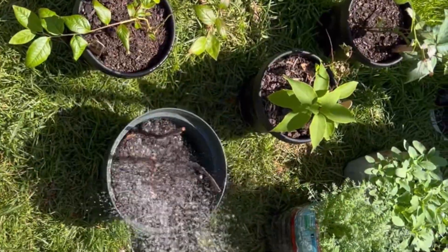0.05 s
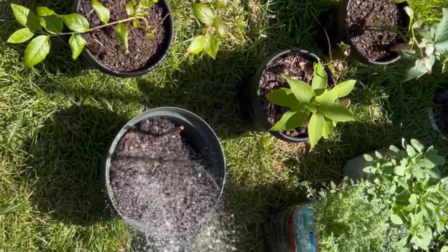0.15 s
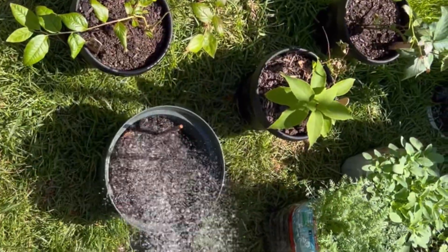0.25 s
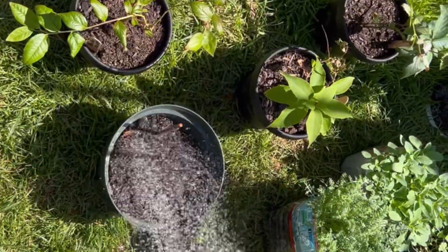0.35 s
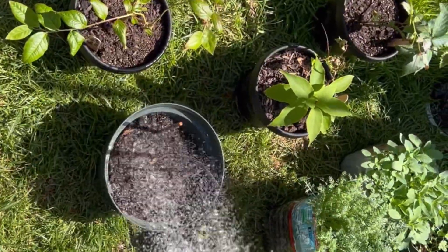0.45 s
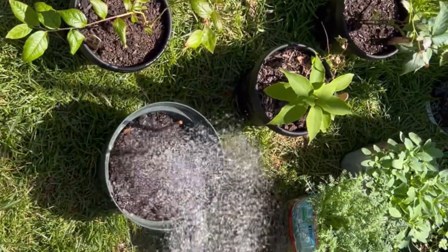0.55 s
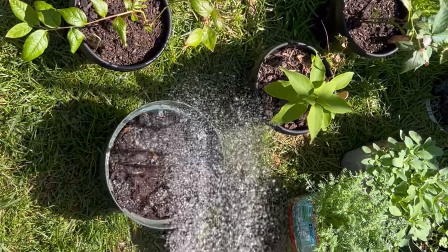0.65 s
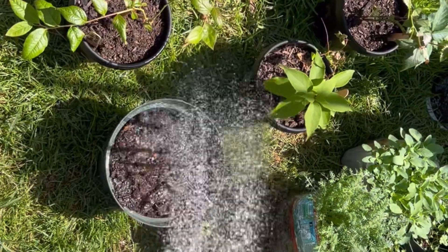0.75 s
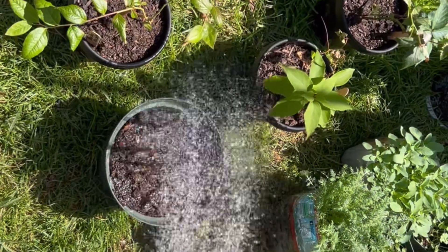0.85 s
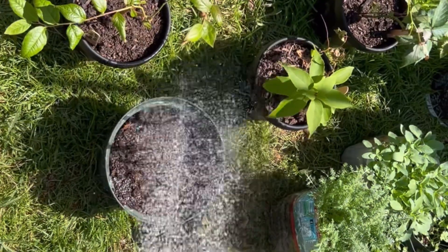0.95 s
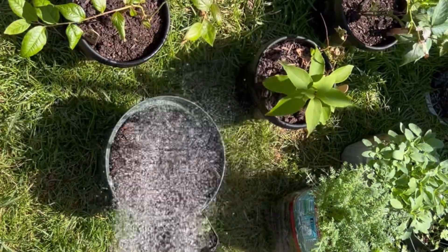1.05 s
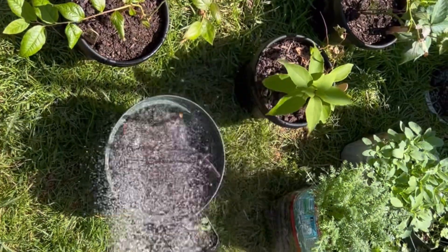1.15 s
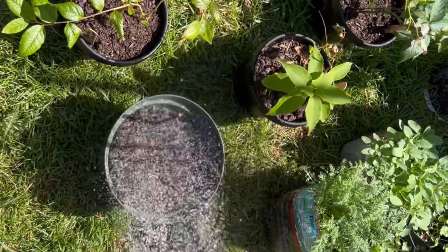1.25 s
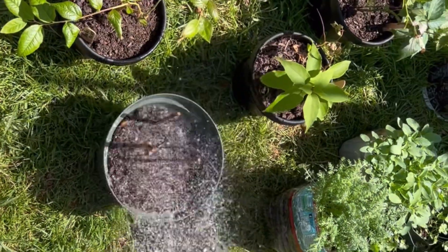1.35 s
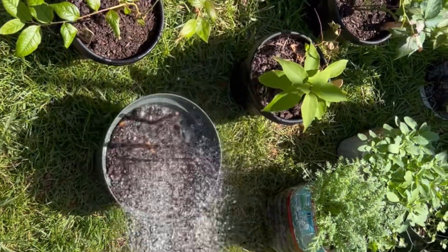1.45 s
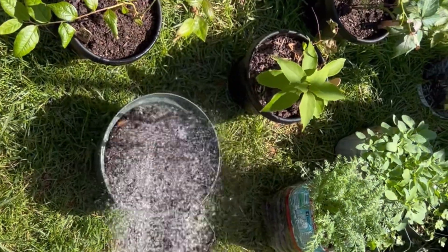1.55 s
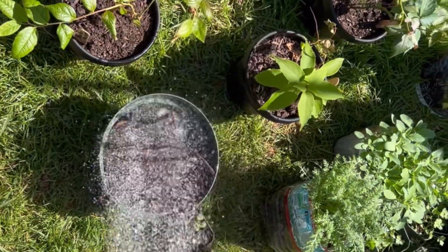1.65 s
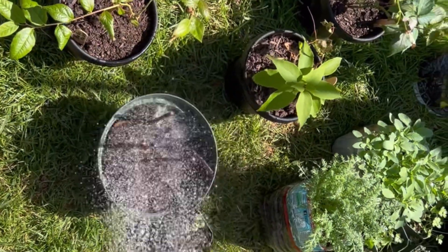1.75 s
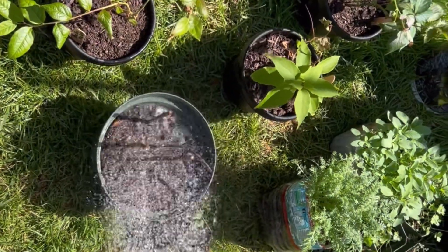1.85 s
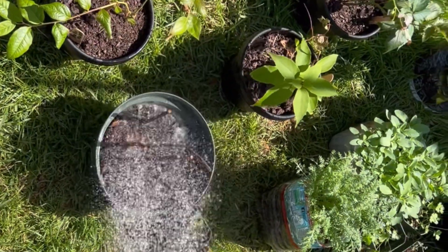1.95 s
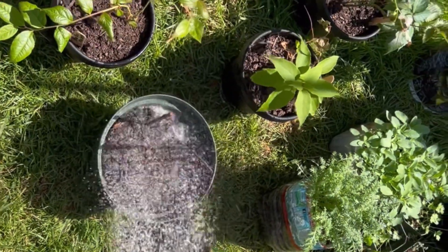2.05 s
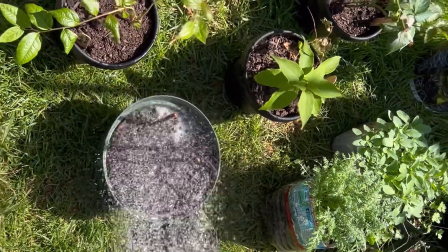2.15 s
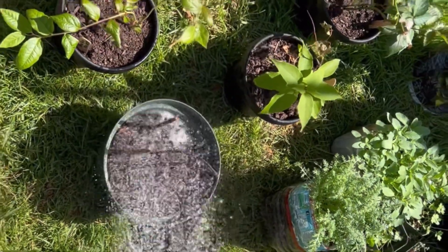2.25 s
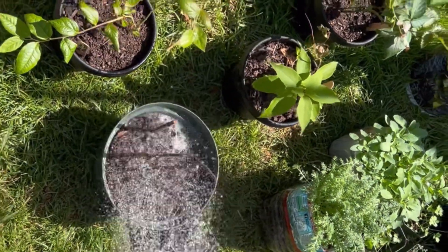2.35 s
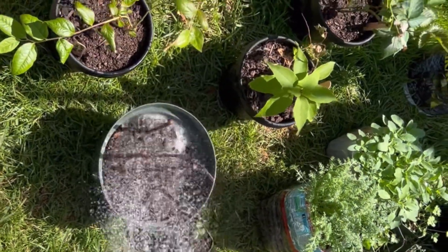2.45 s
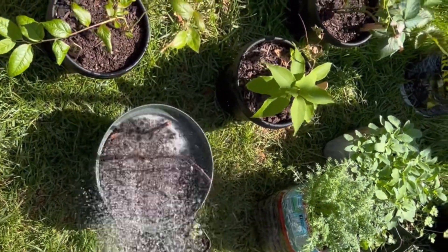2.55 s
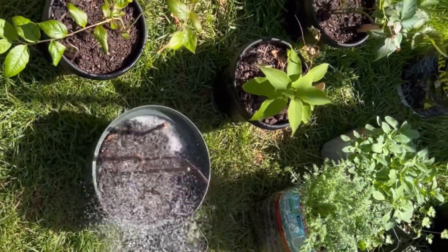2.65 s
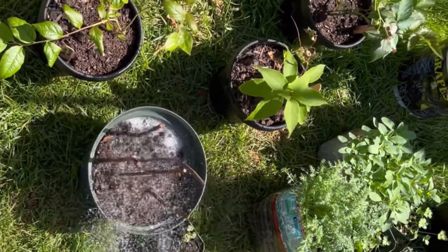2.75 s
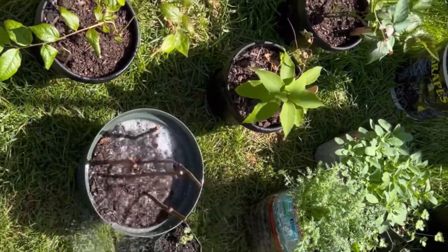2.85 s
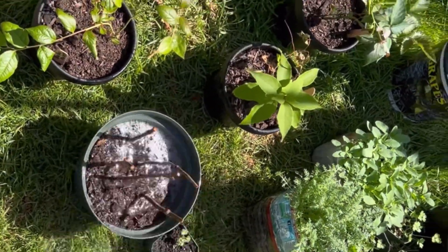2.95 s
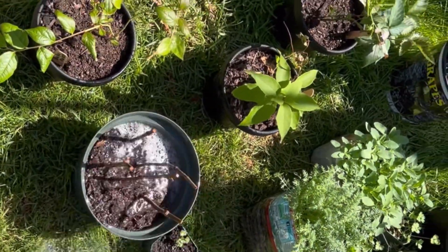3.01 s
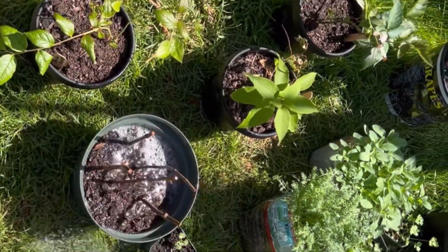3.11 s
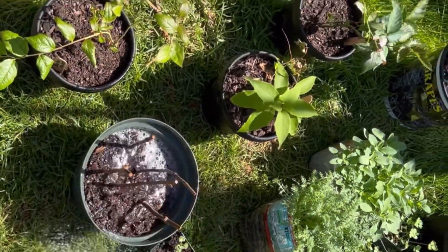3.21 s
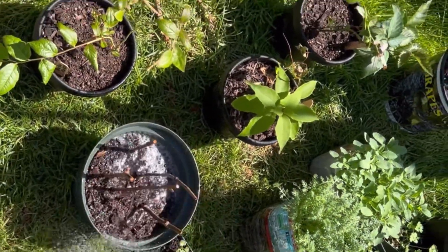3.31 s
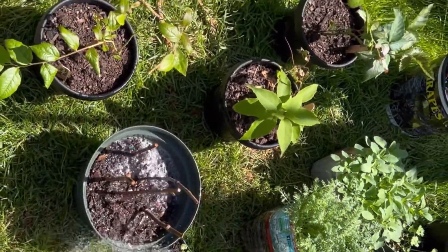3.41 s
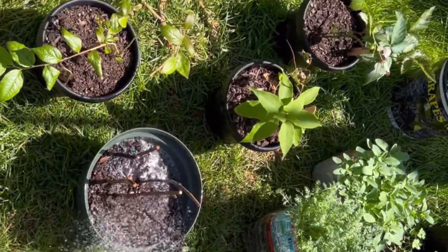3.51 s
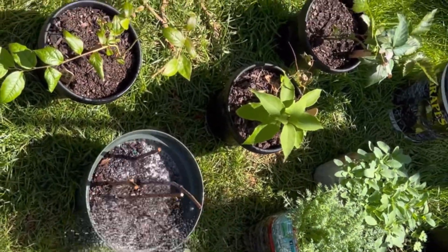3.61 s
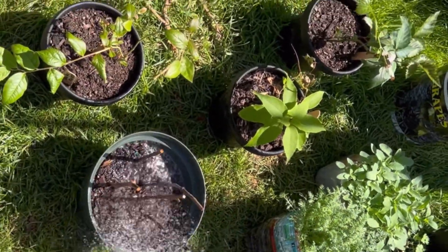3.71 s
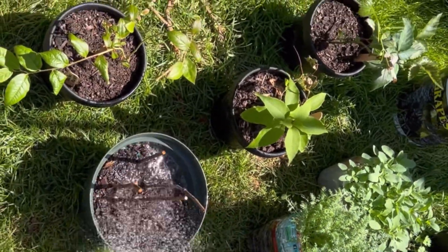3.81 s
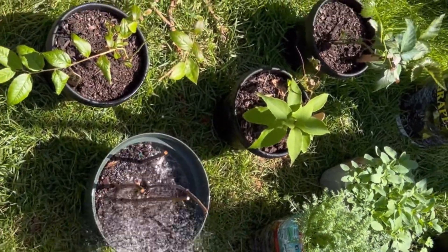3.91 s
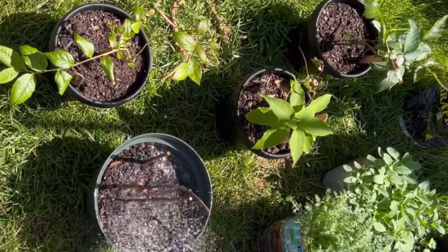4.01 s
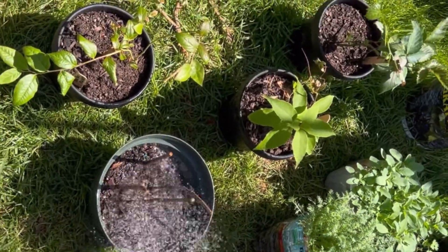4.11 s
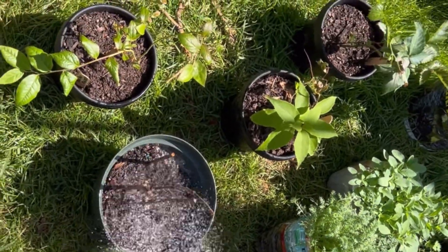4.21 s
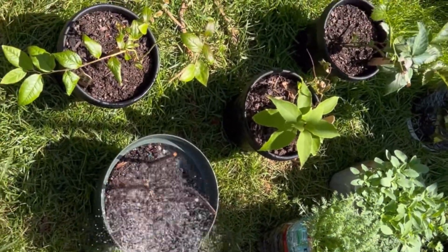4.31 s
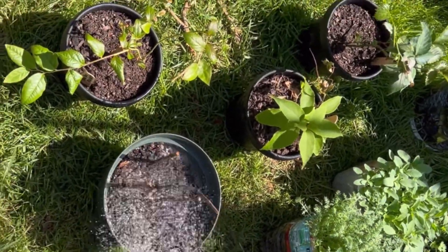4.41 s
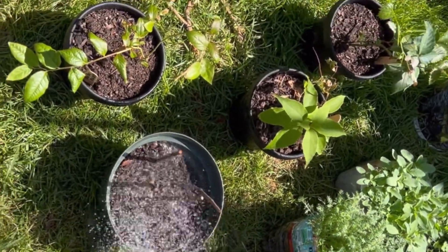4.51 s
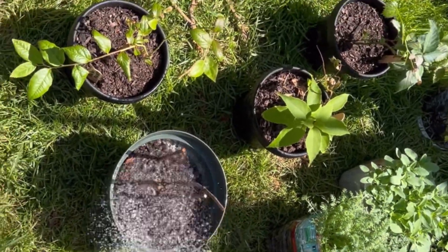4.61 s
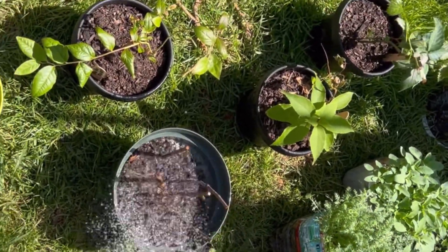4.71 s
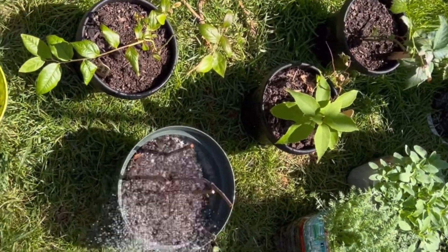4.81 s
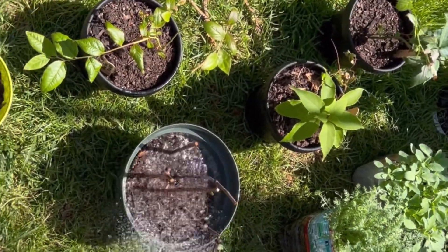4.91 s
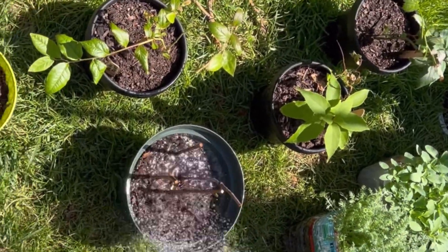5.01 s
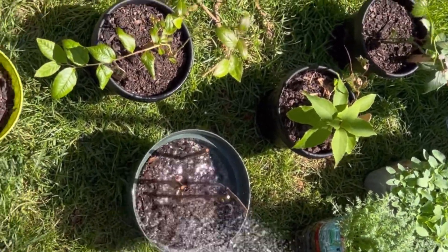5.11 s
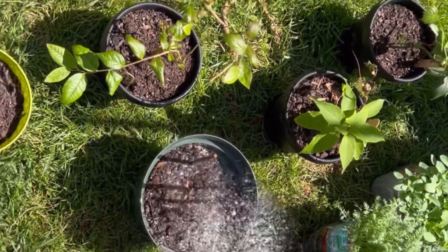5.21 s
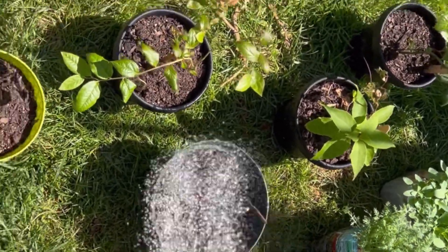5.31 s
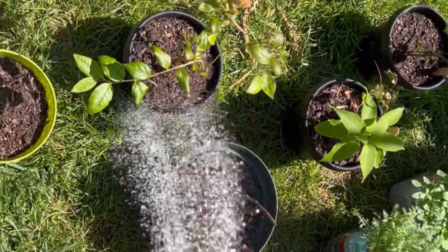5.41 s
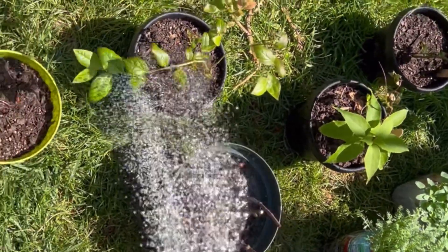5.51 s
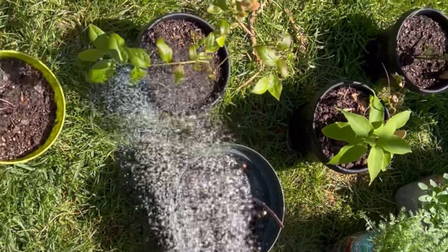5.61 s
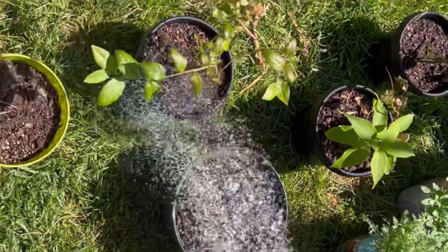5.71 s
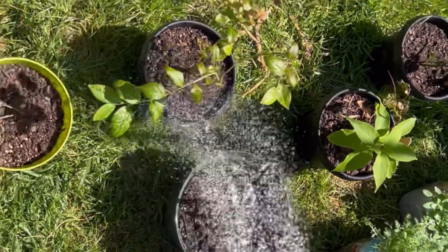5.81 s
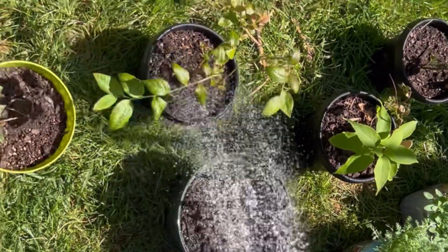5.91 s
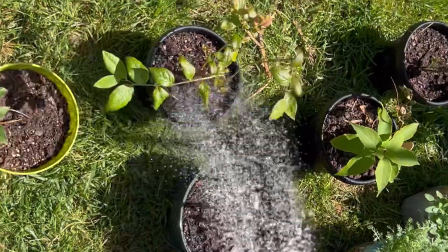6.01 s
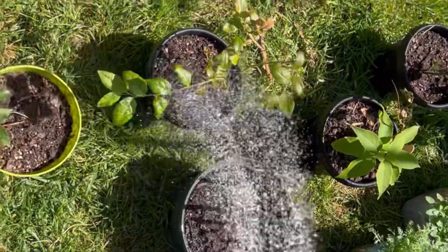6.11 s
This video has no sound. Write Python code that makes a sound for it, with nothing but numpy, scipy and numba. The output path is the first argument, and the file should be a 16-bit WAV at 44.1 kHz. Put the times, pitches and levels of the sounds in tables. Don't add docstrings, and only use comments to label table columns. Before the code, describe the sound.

A garden hose is heard outdoors at arm's length through a phone's stereo microphones. From 0 to 0.4 s a bright, strong jet hiss dominates, with coarse splashing on drier soil; it then drops back abruptly. Brief brushes and ticks come around 0.6 s, and the spray fills out from about 1.1 s into a dense, fine, sizzling shower with soil thuds. Watery bubble plops cluster at 2.05-2.3 s. Near 2.7-2.8 s the hiss surges and drops crack on the rim, then the patter falls away, leaving a thin nozzle hiss until about 3.4 s. Spray returns, fullest after 4.1 s, with crisp rim pings and ticks. A short splashy swell at 5.3 s leads to lighter, fizzing patter on leaves until just past 6 s. Traffic rumbles low throughout; from 2 s a faint distant engine hums, revs and wavers, with slight leaf rustle.

```python
import sys
import numpy as np
from scipy import signal
from scipy.fft import rfft, irfft
from scipy.io import wavfile
from scipy.ndimage import uniform_filter1d
from numba import njit

SR = 44100
rng = np.random.default_rng(int(sys.argv[2]) if len(sys.argv) > 2 else 0)


def bounce(signal):
    frames = np.transpose(np.atleast_2d(signal))
    limited = np.clip(frames, -1, 1)
    pcm = np.round(limited * 32767).astype(np.int16)
    wavfile.write(sys.argv[1], SR, pcm)


def to_linear_factor(level_db):
    exponent = np.asarray(level_db, float) / 20
    return 10 ** exponent


N = 271479
TIME = np.arange(N) / SR
HZ = np.fft.rfftfreq(N, 1 / SR)
ALIKE = np.array([[1], [0]])


def read(points):
    hz, value = np.transpose(points)
    return np.interp(np.log(HZ + 1), np.log(hz + 1), value)


def curves(table):
    s, *columns = np.transpose(table)
    return [np.interp(TIME, s, column) for column in columns]


def unit(x):
    return x / np.sqrt(np.mean(x ** 2))


def hiss():
    return rng.standard_normal((2, N))


def colour(x, points):
    low_hz, high_hz = points[0][0], points[-1][0]
    low_edge = 1 / (1 + (low_hz / (HZ + 1)) ** 4)
    high_edge = 1 / (1 + (HZ / high_hz) ** 4)
    return unit(irfft(rfft(x) * to_linear_factor(read(points)) * low_edge * high_edge, N))


def ring(x, modes):
    power = 0
    for hz, width, db in modes:
        off_pitch = (HZ ** 2 - hz ** 2) / (1.7 * width * (HZ + 1))
        power = power + to_linear_factor(2 * db) / (1 + off_pitch ** 2) ** 2
    return unit(irfft(rfft(x) * np.sqrt(power), N))


def walk(rate):
    hold = int(SR / rate)
    levels = np.repeat(rng.standard_normal(N // hold + 1), hold)
    return unit(uniform_filter1d(levels, hold)[:N])


@njit
def grains(start, hz, cycles, size, glide):
    out = np.zeros(N)
    for k in range(len(start)):
        step = 2 * np.pi * hz[k] / SR
        phase, gain, fade = 0., size[k], np.exp(-hz[k] / SR / cycles[k])
        for i in range(start[k], min(N, start[k] + int(6 * cycles[k] * SR / hz[k]))):
            out[i] += gain * min(phase / (2 * np.pi), 1.) * np.sin(phase)
            phase += step
            step *= 1 + glide * hz[k] / SR
            gain *= fade
    return out


def shower(count, low_hz, high_hz, cycles, spread_db, biggest_db):
    when, pitch, length, size = rng.random((count, 4)).T
    hz = np.minimum(low_hz + (high_hz - low_hz) * pitch, .45 * SR)
    size_db = biggest_db * np.tanh(-spread_db * np.log(1 - size) / biggest_db)
    strength = to_linear_factor(size_db) * np.sqrt(hz / high_hz)
    start = (when * N).astype(np.int64)
    return unit(grains(start, hz, cycles * (.5 + length), strength, .02))


def two_showers(**settings):
    return [shower(**settings) for _ in range(2)]


def drops(table, cycles, glide, gain_db):
    s, db, hz = np.transpose(table)
    return grains((s * SR).astype(np.int64), 1. * hz, cycles + 0 * s, to_linear_factor(db + gain_db), glide)


def fade(x, tail_s):
    return signal.lfilter([1], [1, -np.exp(-1 / (tail_s * SR))], x)


def clumps(count, tail_s, cap):
    when, size = rng.random((count, 2)).T
    x = fade(np.bincount((when * N).astype(np.int64), -np.log(1 - size), N), tail_s)
    return cap * np.tanh(unit(x - x.mean()) / cap)


# t/s, chamber ring level/dB, jet or rim drumming level/dB
GRIPS = [(0, -46.5, -34.5), (.39, -48.5, -41), (.43, -48.5, -55), (.63, -48, -45), (.7, -48, -60),
         (1.0, -47, -49.5), (1.2, -50, -51), (2.0, -49, -49), (2.69, -46, -40), (2.83, -51.5, -47.5),
         (3.27, -47, -44), (3.33, -46.5, -53.5), (3.75, -46.5, -47.5), (5.2, -45.5, -44.5),
         (5.4, -44.5, -57), (5.72, -46.5, -55.5)]


def grips():
    s, *columns = np.transpose(GRIPS)
    now = np.searchsorted(s, TIME, "right") - 1
    slide_s = .018
    return [uniform_filter1d(column[now], int(slide_s * SR)) for column in columns]


# f/Hz, width/Hz, level/dB
CHAMBER = [(1577, 175, -4.5), (1920, 75, 0), (2180, 82, 2.5), (2338, 157, -1.5)]
# f/Hz, width/Hz, level/dB
JET_WIDE = [(1560, 59, -8), (3470, 130, 1.5), (4470, 280, -5.5), (5700, 360, -8), (6810, 360, -8),
            (7840, 800, -2), (8340, 680, 2.5), (9700, 600, -3.5), (10600, 750, -5.5)]
# f/Hz, width/Hz, level/dB
JET_HALF = [(3280, 480, -2.5), (4610, 190, 1), (5500, 180, -3), (6360, 410, 2.5), (7000, 900, -12),
            (7870, 1400, 1.5), (10400, 1700, -11), (14200, 4000, -12)]
# f/Hz, level/dB
RIM = [(4500, -3), (6200, -3.5), (7200, -10), (8200, 0), (9200, -4), (11000, -21)]


def nozzle():
    chamber_db, jet_db = grips()
    chamber = ring(hiss(), CHAMBER) * to_linear_factor(chamber_db + 0.91 * walk(25) + 1.0)
    taps = two_showers(count=5000, low_hz=5330, high_hz=10150, cycles=2.8, spread_db=4.0, biggest_db=26)
    jet = colour(0.86 * hiss() + taps, RIM) * to_linear_factor(-2.0)
    jet = np.where(TIME < .43, ring(hiss(), JET_WIDE) * to_linear_factor(-3.0), jet)
    half_shut = (TIME > 2.83) & (TIME < 3.33)
    jet = np.where(half_shut, ring(hiss(), JET_HALF) * to_linear_factor(0.5), jet)
    return chamber + jet * to_linear_factor(jet_db + 1.3 * walk(30))


# t/s, spray landing on the pot level/dB, coarseness of the drops level/dB
SPRAY = [(0, -45, 2.5), (.4, -46, 2.5), (.44, -45.5, -5.5), (.59, -46, -2.5), (.66, -43, -2.5),
         (.89, -42.5, -1), (1.1, -38.5, -4), (1.5, -39, -2.5), (2.47, -38.5, -2), (2.81, -40.5, -5.5),
         (2.85, -52.5, -0.5), (3.0, -57, -1), (3.47, -51.5, -1), (3.53, -47, -4.5), (4.15, -42, -5.5),
         (5.25, -46.5, -2.5), (5.42, -52.5, 1.5), (6.16, -45, -2.5)]
# t/s, change level/dB, half length/s, share felt by coarse drops
SWAYS = [(0.628, 8, .02, 0.71), (1.294, 5, 0.0076, .3), (1.39, 1, 0.025, .3), (1.438, -3.5, 0.024, 1.2),
         (1.726, 0, 0.058, .3), (1.945, 2, 0.014, .2), (2.747, 2, 0.039, 2.9), (3.524, 3.5, .02, .6),
         (4.272, 1.5, 0.016, 1.6), (4.818, 2, 0.0088, 1.9), (5.04, -0.5, 0.045, .3),
         (5.322, 10, 0.054, 0.75), (5.593, 6.5, 0.019, .2), (5.628, -7, .008, .3), (5.65, 2.5, 0.024, .3),
         (5.8, -6, 0.044, .1), (6.134, 3, .01, .6)]


def landing():
    aim_db, coarse_db = curves(SPRAY)
    fine_db, splash_db = aim_db, aim_db + coarse_db
    for at, change_db, half_s, share in SWAYS:
        sway_db = change_db * np.clip(1 - abs(TIME - at) / half_s / 2, 0, 1)
        fine_db = fine_db + sway_db
        splash_db = splash_db + share * sway_db
    dry_db = -7 * np.clip((.43 - TIME) / 0.087, 0, 1)
    above_usual_db = splash_db + 45
    puddle_db = -53 + 0.87 * above_usual_db + dry_db
    soil_db = -54 + 0.38 * above_usual_db + 0.43 * dry_db
    return fine_db, splash_db, puddle_db, soil_db


# f/Hz, level/dB
FINE = [(5000, -18.5), (7500, -5.5), (9500, -2), (11000, 1), (12200, -4), (14000, -5.5), (15700, -7.5),
        (30000, 4)]
# f/Hz, level/dB
SPLASH = [(1500, -7), (2600, 2), (3500, 1.5), (4600, 0), (5200, -5.5), (7000, -6), (9000, -24)]
# f/Hz, level/dB
PUDDLE = [(500, -9), (800, 3), (1250, 0), (1600, 4.5), (2000, 5), (2600, -13), (3500, -23)]
# f/Hz, level/dB
SOIL = [(150, 1), (250, 1), (400, -0.5), (600, -2.5), (1000, -3)]


def spray():
    fine_db, splash_db, puddle_db, soil_db = landing()
    slugs = clumps(count=400, tail_s=0.03, cap=1.8)
    ticks = two_showers(count=16000, low_hz=4840, high_hz=16900, cycles=0.96, spread_db=5.0, biggest_db=10)
    pops = two_showers(count=9000, low_hz=1800, high_hz=7000, cycles=2.5, spread_db=2.6, biggest_db=14)
    bubbles = two_showers(count=4000, low_hz=586, high_hz=3180, cycles=2.3, spread_db=-2.5, biggest_db=12)
    fine = colour(1.02 * hiss() + ticks, FINE) * to_linear_factor(fine_db + 0.78 * slugs + 2.0)
    splash = colour(2.4 * hiss() + pops, SPLASH) * to_linear_factor(splash_db + 1.5 * slugs - 1.2)
    puddle = colour(2.4 * hiss() + bubbles, PUDDLE) * to_linear_factor(puddle_db + 0.12 * slugs + 3.5)
    soil = colour(hiss(), SOIL) * to_linear_factor(soil_db + 1.3 * walk(12))
    return fine + splash + puddle + soil


# f/Hz, level/dB (per Hz)
TOWN = [(22, -26), (48, 0), (69, 3), (127, -3.5), (166, -7.5), (300, -16.5), (600, -22), (1300, -26),
        (5000, -36), (15500, -50), (30000, -36)]


def traffic():
    return colour(hiss(), TOWN) * to_linear_factor(-49.5 + 1.3 * walk(6))


# f/Hz, level/dB
RUSTLE = [(2400, 0), (3000, 0), (3500, -3)]


def rustle():
    calm_db = -8 * np.clip((2.3 - TIME) / .2, 0, 1)
    leaves = colour(rng.standard_normal(N), RUSTLE) * to_linear_factor(-61 + calm_db + 2.0 * walk(6))
    return leaves * np.array([[1], [-1]])


# t/s, peak level/dB, f/Hz
PLOPS = [(0.1285, -23, 3260), (1.3702, -28, 2330), (1.6386, -23.5, 1610), (1.8715, -23, 2120),
         (2.0534, -34.5, 1950), (2.065, -22.5, 1810), (2.0774, -17, 4380), (2.0974, -27, 1920),
         (2.1044, -23, 4020), (2.1094, -23, 2520), (2.1204, -24, 2030), (2.1429, -23.5, 2040),
         (2.1684, -23, 1600), (2.1759, -22, 1270), (2.2564, -28, 2030), (2.2784, -26, 2100),
         (2.5625, -27, 1970), (2.6059, -35.5, 1910), (2.6982, -28, 2210), (2.7366, -19.5, 2180),
         (2.7939, -29, 1740), (3.92, -29, 3200), (3.9902, -24.5, 2120), (4.089, -31, 3300),
         (4.167, -24, 3900), (4.815, -27, 4200), (4.9111, -28, 2130), (5.2848, -27, 2230)]


def plops():
    return drops(PLOPS, cycles=1.9, glide=0.014, gain_db=1.9) * ALIKE


# f/Hz, level/dB
SPLATTER = [(3500, -2), (6000, -5), (9000, 4), (11500, 2), (15700, -9), (30000, 0)]


def fizz(table, tail_s, gain_db):
    s, db, hz = np.transpose(table)
    hits = np.bincount((s * SR).astype(np.int64), to_linear_factor(db + gain_db), N)
    return fade(hits, tail_s) * colour(hiss(), SPLATTER)


# t/s, peak level/dB, f/Hz
TICKS = [(0.615, -19.5, 8900), (0.6744, -25, 8250), (0.9167, -22, 10800), (0.9458, -23, 11500),
         (1.1887, -25, 11100), (1.2143, -19.5, 9620), (1.2858, -18, 11100), (1.5484, -28, 10800),
         (1.5574, -22, 8310), (1.6273, -25, 10900), (1.9535, -15, 9860), (2.4517, -17, 10800),
         (2.6085, -27, 11200), (2.7202, -20, 11600), (3.589, -25.5, 10400), (4.1694, -46, 10900),
         (4.2368, -25.5, 9260), (4.261, -16.5, 11800), (4.3071, -27, 10700), (4.4363, -27, 10900),
         (4.5062, -20.5, 10000), (4.6064, -23, 11400), (4.6513, -22, 11100), (4.684, -23, 11700),
         (4.8114, -26, 11200), (4.9214, -20.5, 10100), (4.9372, -24, 10800), (4.9798, -18, 11600),
         (5.225, -25.5, 11000), (5.2919, -29, 9430)]


def rim_ticks():
    crack = drops(TICKS, cycles=6.2, glide=0.0079, gain_db=-1.5)
    return crack * ALIKE + fizz(TICKS, tail_s=0.0022, gain_db=-10.5)


# t/s, firing rate f/Hz, level/dB
ENGINE = [
    (1.95, 94.6, -50),
    (2.8, 124.8, -56),
    (3.06, 124.5, -49),
    (4.15, 128.8, -51),
    (4.67, 124, -52),
    (5.05, 136, -63),
    (5.22, 134.4, -50.5),
    (5.95, 137, -54.5),
    (6.16, 128, -57),
]


def engine():
    hz, db = curves(ENGINE)
    phase = 2 * np.pi * np.cumsum(hz * (1 + 0.0051 * walk(12))) / SR
    start = np.clip((TIME - ENGINE[0][0]) / 0.064, 0, 1)
    hum = np.sin(phase) + 0.13 * np.sin(phase / 2)
    return hum * to_linear_factor(db + 0.5) * start * ALIKE


# t/s, peak level/dB, f/Hz
SPITS = [(2.7824, -25, 11300), (2.7904, -23, 10000), (2.7944, -21, 11200), (2.8064, -19, 10400),
         (2.8174, -25, 10100)]


def spits():
    return drops(SPITS, cycles=5.4, glide=0.005, gain_db=-1.5) * ALIKE


# t/s, peak level/dB, f/Hz
PINGS = [(3.6521, -42, 8040), (3.686, -23.5, 8450), (3.7399, -28, 7980), (3.7694, -41, 8590),
         (3.7953, -36, 8100), (3.8526, -27, 7860), (3.8765, -29, 7330), (3.9095, -40, 9250),
         (3.9394, -38, 8360), (4.1694, -24, 8700), (4.1979, -44, 9500), (4.2148, -21, 8510),
         (4.2368, -33, 9260), (4.2744, -33, 6490), (4.3196, -30, 9100), (4.5062, -30, 9490),
         (4.6838, -36, 8180), (4.8115, -33, 6300), (4.8688, -28, 6500), (4.9207, -27, 9300),
         (5.0305, -32, 8350), (5.1104, -33, 6480), (5.1821, -40, 8260), (5.232, -34, 8570)]


def pings():
    return drops(PINGS, cycles=10.0, glide=.002, gain_db=-3.3) * ALIKE


# t/s, peak level/dB, f/Hz
LEAF_DROPS = [(5.376, -28, 9200), (5.426, -29.5, 9040), (5.5019, -39, 9840), (5.5443, -32.5, 9890),
              (5.5737, -33, 10400), (5.6381, -28.5, 9060), (5.7663, -24, 9570), (5.8002, -26, 10100),
              (5.8351, -32, 11100), (5.8566, -39, 9200), (5.8646, -30.5, 10600), (5.911, -28.5, 10800),
              (5.9783, -29, 10300), (6.0237, -28, 9010), (6.0701, -26.5, 9160), (6.1045, -28.5, 9380),
              (6.1394, -28, 11600)]


def leaf_drops():
    crack = drops(LEAF_DROPS, cycles=4.6, glide=0.0079, gain_db=-6.0)
    return crack * ALIKE + fizz(LEAF_DROPS, tail_s=0.0077, gain_db=-8.1)


# f/Hz, lead/radians
LEAD = [(250, 0), (600, -.4), (1100, -.2), (1450, 0), (4900, 0), (5900, -.75), (7300, -1.1), (12700, -1.05),
        (16000, -1.4)]
# f/Hz, level/dB
APART = [(60, -23), (130, -20), (250, -15), (400, -11), (700, -7), (1250, -10), (1500, -30), (2900, -21),
         (4300, -27), (5600, -11), (8000, -7), (13000, -4)]
# f/Hz, level/dB
TILT = [(100, 0), (250, 2), (500, 2.5), (900, 1), (1400, 0), (15000, 0)]


def two_ports(sound):
    shared, apart = sound
    sign = np.array([[1], [-1]])
    port = to_linear_factor(sign * read(TILT) / 2) * np.exp(.5j * sign * read(LEAD))
    return irfft(rfft(shared) * port + sign * rfft(apart) * to_linear_factor(read(APART)), N)


def scene():
    water = nozzle() + spray() + plops() + rim_ticks() + spits() + pings() + leaf_drops()
    return two_ports(water + traffic() + engine()) + rustle()


def roll_off(x):
    return signal.sosfilt(signal.butter(12, 16460, fs=SR, output="sos"), x)


def record(dry):
    mix = irfft(rfft(dry) * (HZ < 15780), N)
    return roll_off(mix)


dry = scene()
out = record(dry)
bounce(out)
```